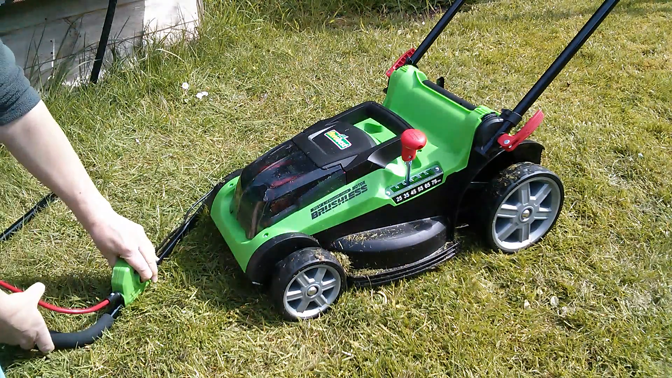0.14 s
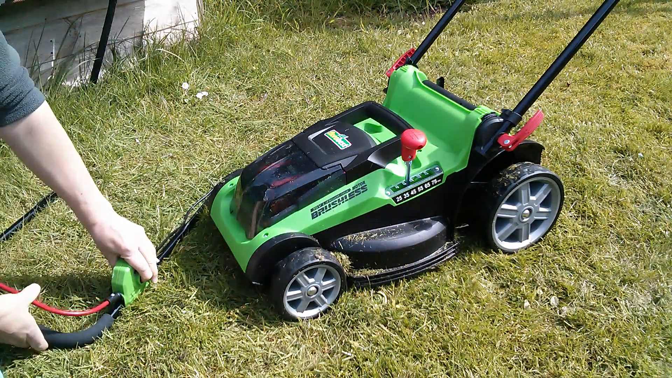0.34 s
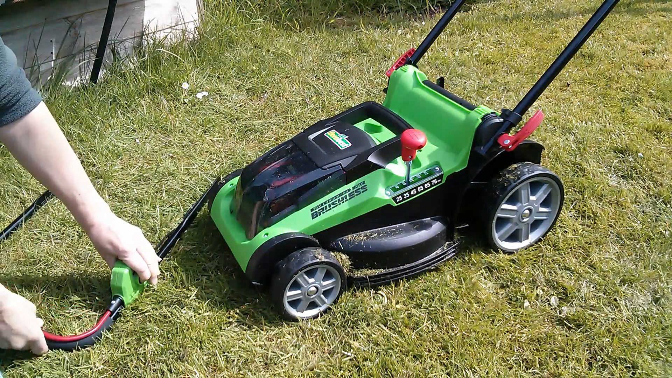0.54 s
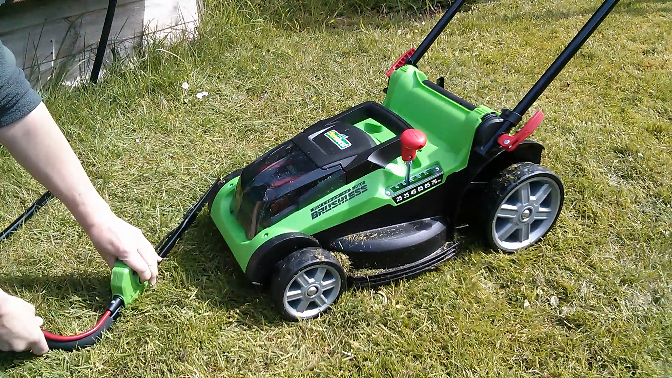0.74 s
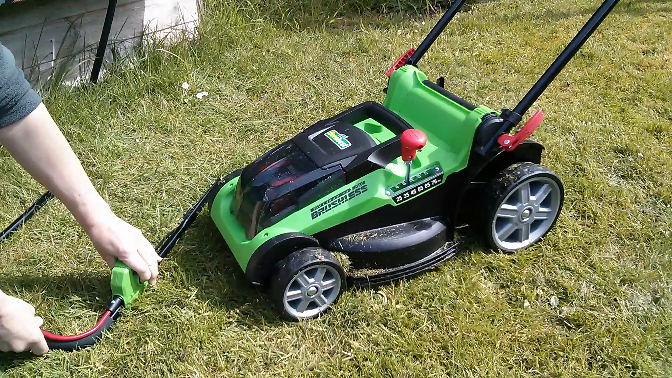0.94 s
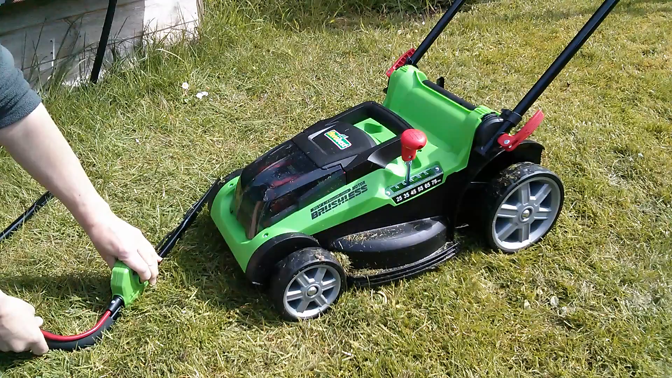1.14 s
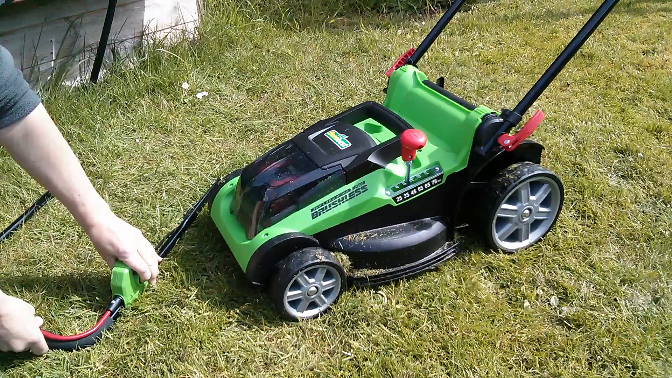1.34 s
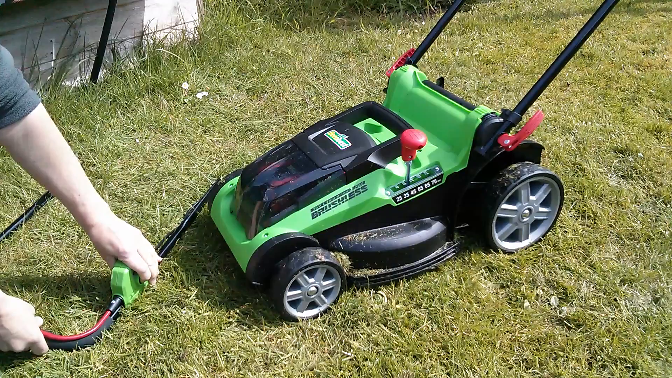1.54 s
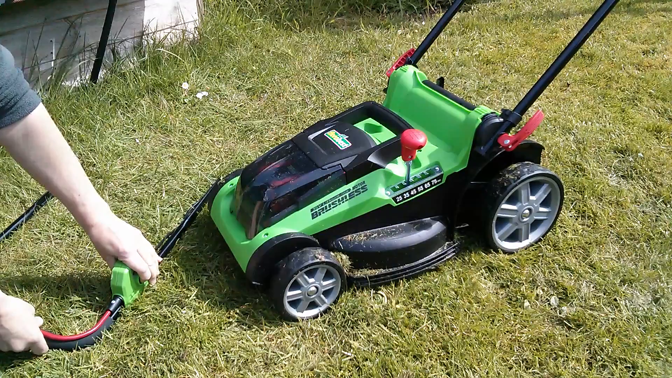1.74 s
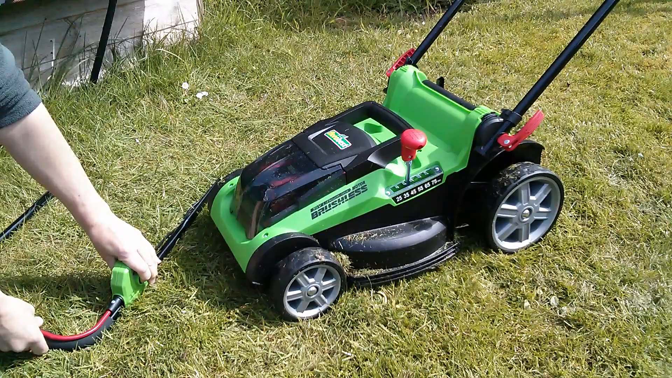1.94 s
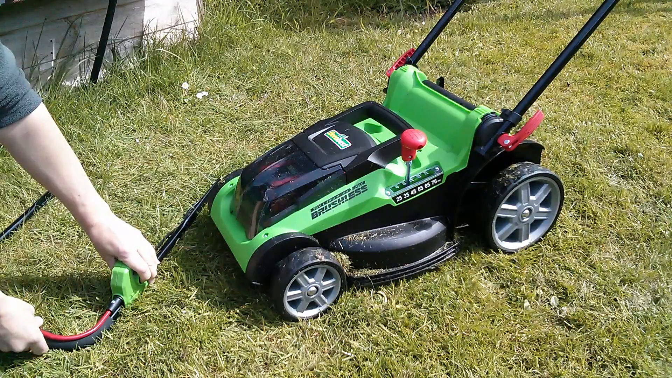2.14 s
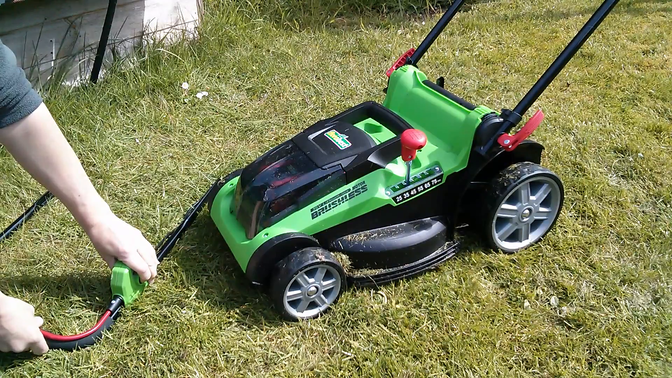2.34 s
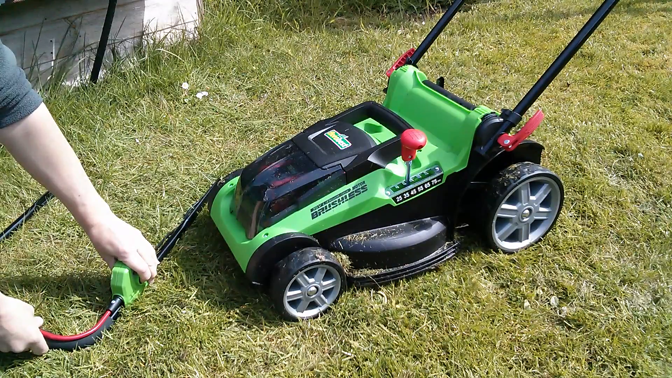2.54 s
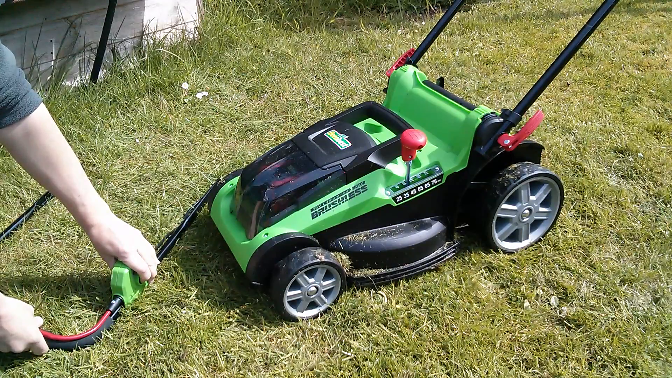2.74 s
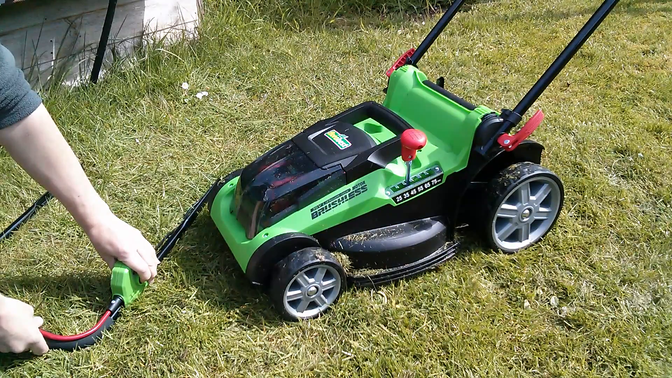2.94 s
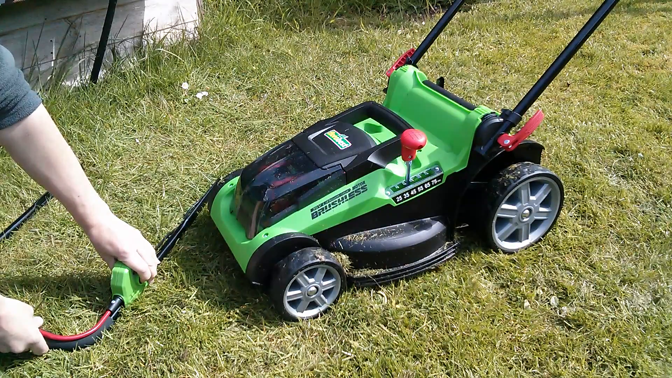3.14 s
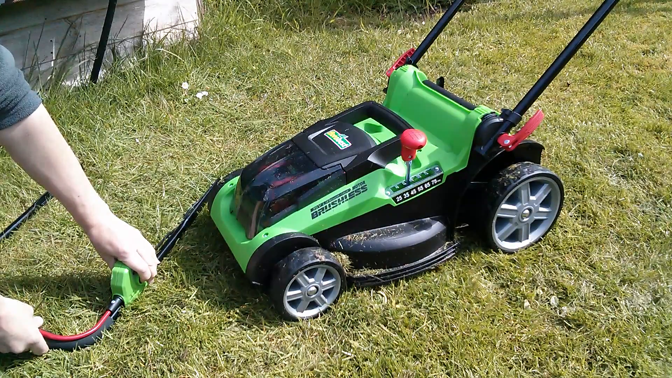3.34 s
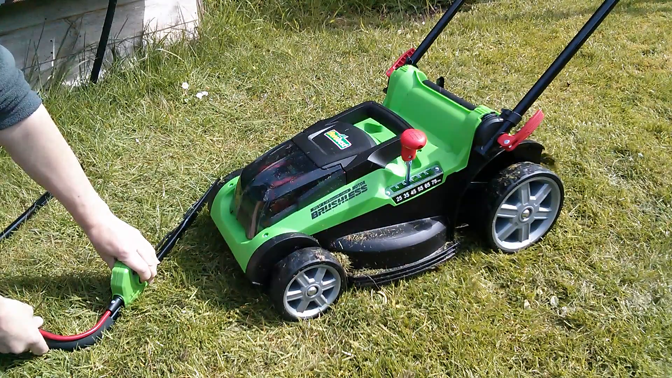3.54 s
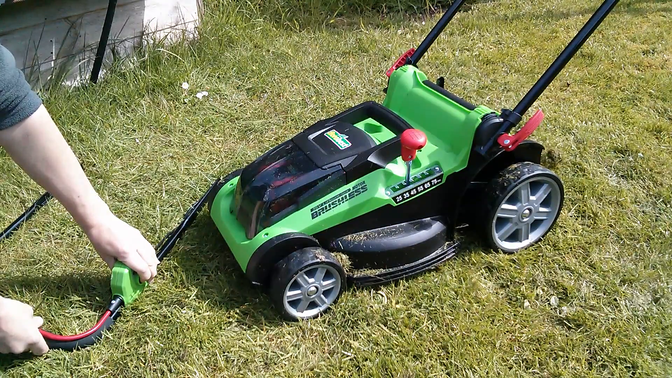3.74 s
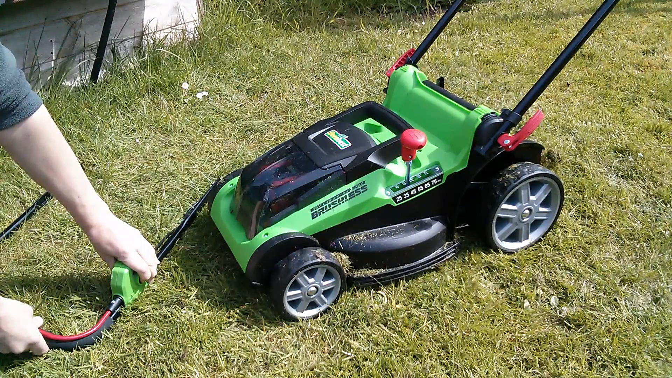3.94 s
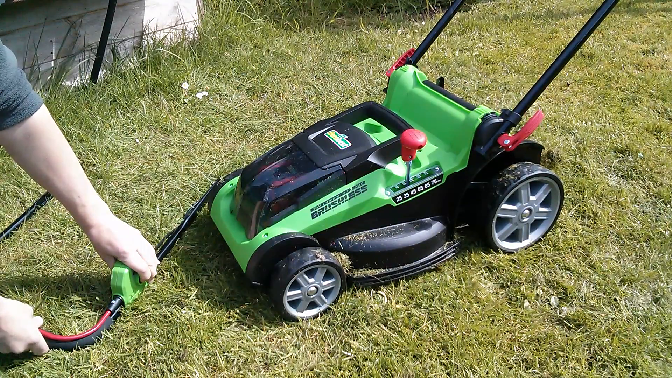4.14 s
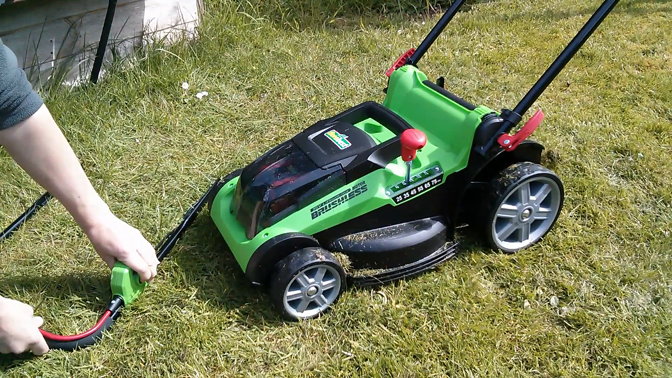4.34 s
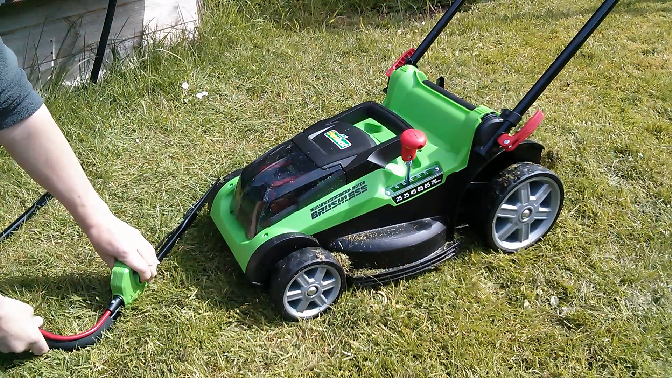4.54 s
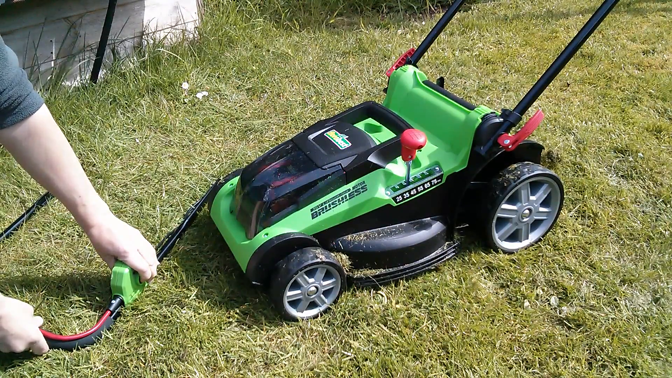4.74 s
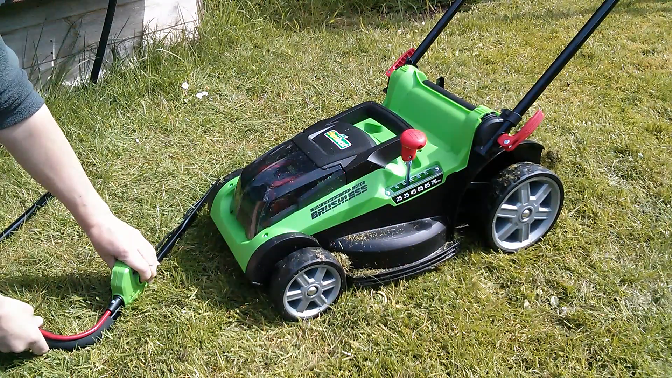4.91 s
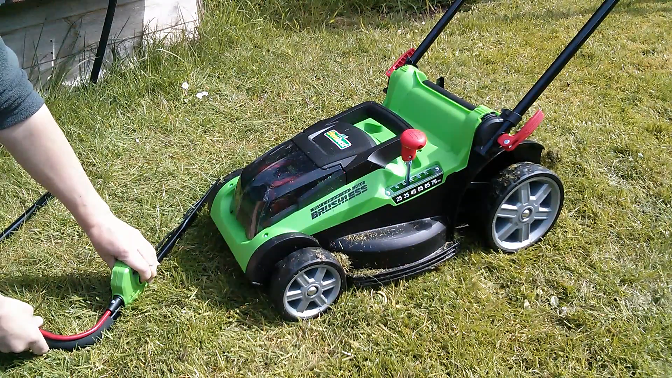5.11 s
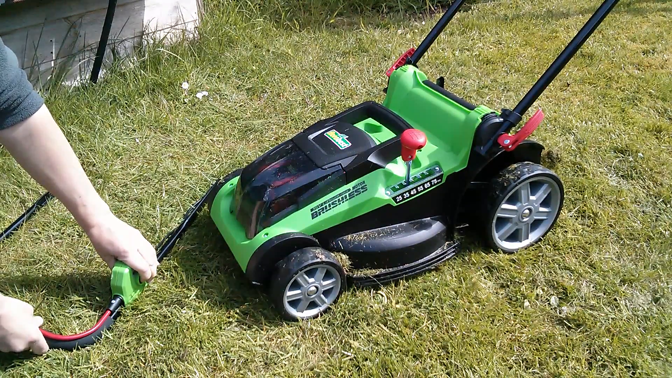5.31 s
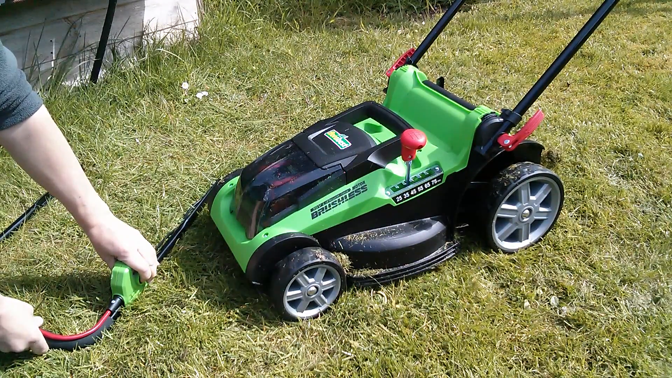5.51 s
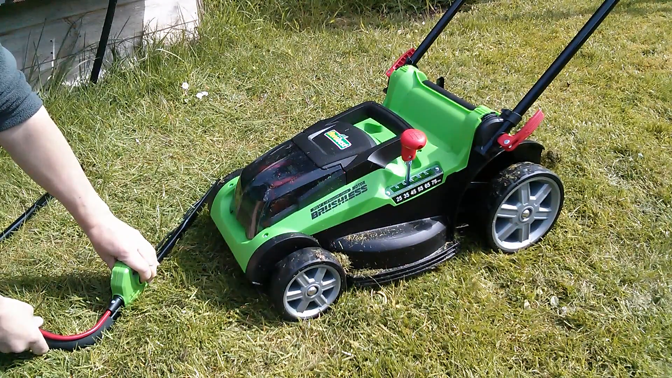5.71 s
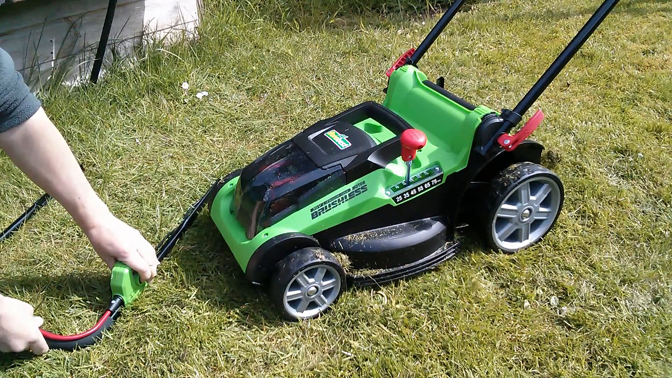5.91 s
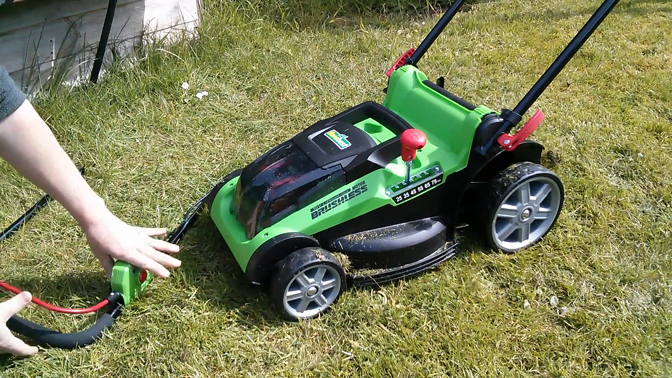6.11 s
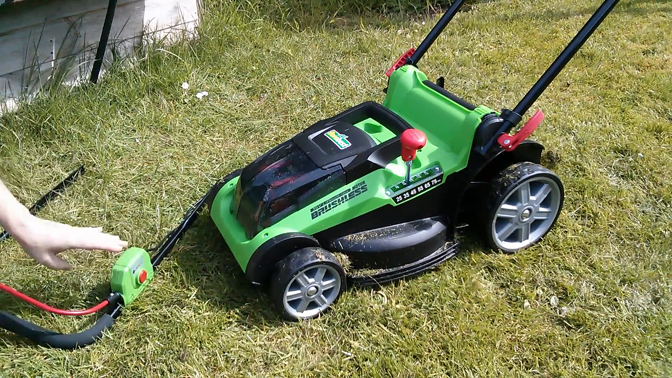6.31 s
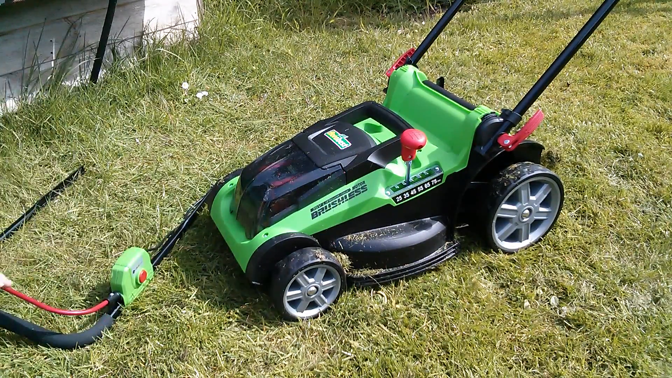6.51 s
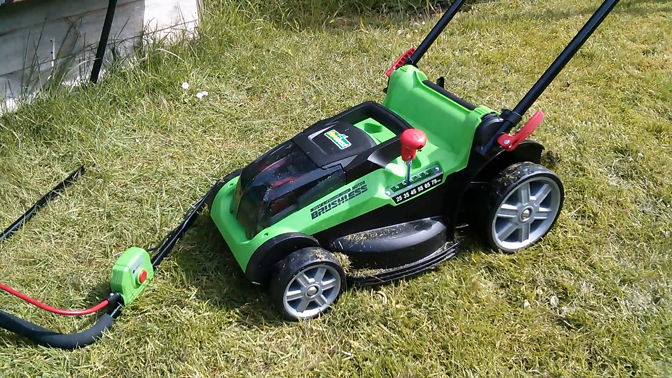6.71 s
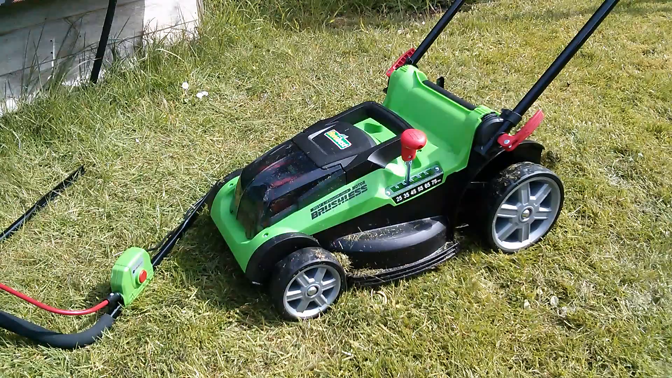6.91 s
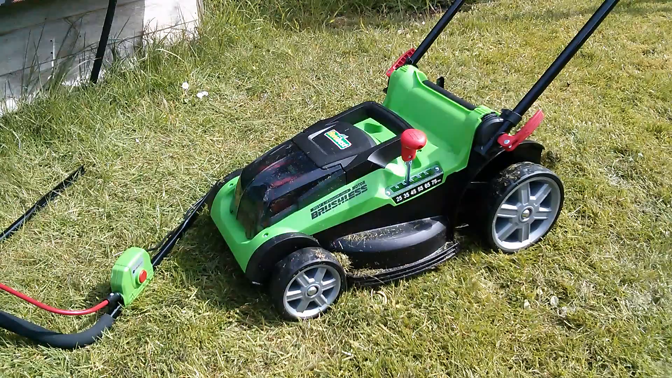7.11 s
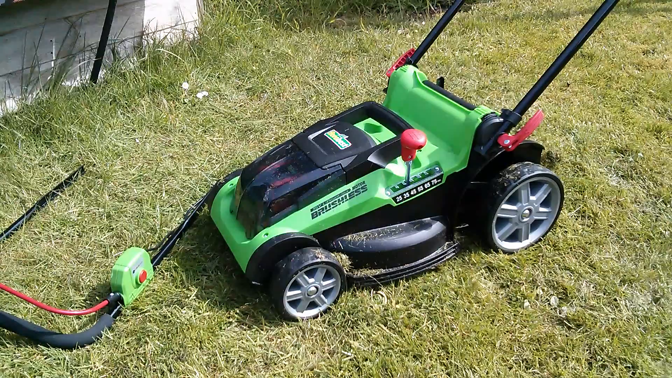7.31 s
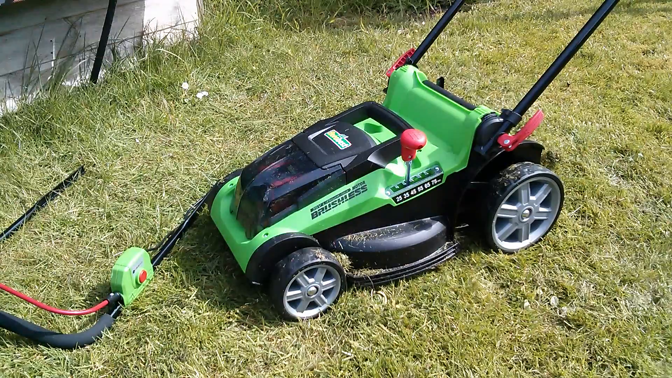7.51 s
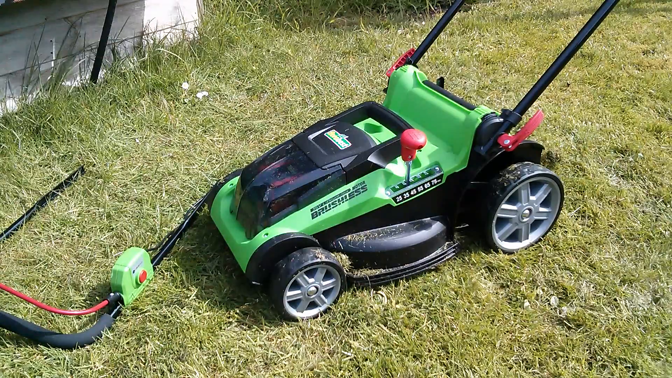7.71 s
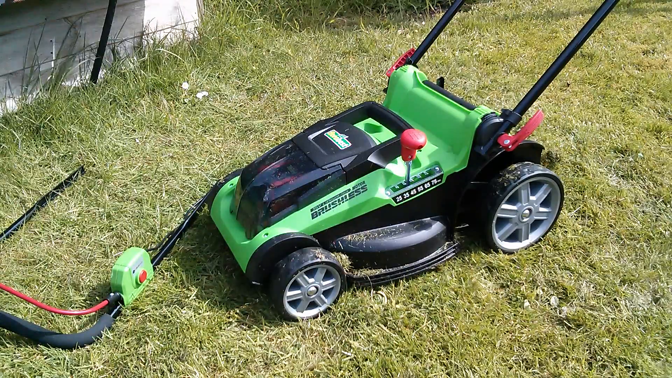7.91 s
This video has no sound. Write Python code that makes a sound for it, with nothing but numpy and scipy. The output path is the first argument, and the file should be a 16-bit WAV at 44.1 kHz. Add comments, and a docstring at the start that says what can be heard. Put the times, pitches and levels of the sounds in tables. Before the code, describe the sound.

A small plastic switch clicks, then a cordless lawnmower starts with a brief stuttering buzz. Its blade spins up with a rising whine and a growing rush of air, and a few grass clippings tick against the deck. It hums steadily until a lever snaps back, then falls in pitch and fades. Light gusts rumble on the microphone now and then over a quiet garden.

```python
"""A lawn in a light breeze, with a cordless mower standing on it. The switch clicks; the brushless motor
jerks into step and spins the blade up. Blade harmonics hum, tip turbulence rushes, clippings tick on
the deck, and the motor's magnetic lines whine through the housing's resonances. The lever snaps back,
the blade slows, and its sound is faded down. Gusts buffet the microphone now and then."""
import sys
import numpy as np
from scipy import signal
from scipy.fft import rfft, irfft, next_fast_len
from scipy.io import wavfile
from scipy.ndimage import uniform_filter1d

SR = 44100
rng = np.random.default_rng(int(sys.argv[2]) if len(sys.argv) > 2 else 0)


def to_wav(s):
    """Save 16-bit WAV."""
    ch = np.atleast_2d(s).T  # columns
    pcm = np.round(np.clip(ch, -1, 1) * 32767)  # PCM
    wavfile.write(sys.argv[1], SR, pcm.astype(np.int16))


N = 351164
TIME_S = np.arange(N) / SR
FREQ_HZ = np.maximum(np.fft.rfftfreq(next_fast_len(N), 1 / SR), 1)
POWER_ON_S, POWER_OFF_S, FULL_SPEED_RPS = 1.262, 6.195, 102.8

# Noise spectra, shape only: freq_hz, density_db
GARDEN_SPECTRUM = [(200, -7.5), (380, -6), (520, -2), (800, 0), (1050, -2.5), (1500, -10), (2100, -18.5),
                   (3100, -32), (4800, -28), (9000, -28), (15000, -26.5)]
FAINT_HISS_SPECTRUM = [(2500, -16), (4500, -5), (9000, -1), (12000, -1), (15800, 7.5)]
WIND_SPECTRUM = [(20, -16.5), (40, -1.5), (65, 2), (120, 1), (185, -6), (240, -15), (330, -30),
                 (500, -41.5)]
SWAY_SPECTRUM = [(15, -9.5), (30, -5), (50, -1)]  # slowest pressure swings
GUST_SPECTRUM = [(25, -14.5), (60, -1), (120, -2), (190, -6), (320, -20.5), (600, -60.5)]
CLICK_SPECTRUM = [(400, 7.5), (1200, 5.5), (2800, -12), (4500, -6), (8700, 0), (11000, -2), (15500, -21)]
RASP_SPECTRUM = [(1500, 1.5), (3000, -21.5), (5500, -11), (7000, -6.5), (8000, 1), (9600, 2),
                 (10800, -20.5), (13000, -9.5), (15500, -19.5)]
RATTLE_SPECTRUM = [(2500, -3), (4600, -2.5), (6200, 1), (7500, -4), (9000, 6), (11000, -4), (13000, -6),
                   (15500, -5)]
WINDING_SPECTRUM = [(2900, -25), (3350, 0.5), (3700, 4.5), (4300, -10)]
RUSH_SPECTRUM = [(260, -59.5), (450, -1), (626, -3), (760, -7), (840, -7.5), (998, -10.5), (1380, -8),
                 (1760, -15.5), (2030, -15.5), (2180, -20), (2360, -22.5), (2500, -27), (3250, -73.5),
                 (5500, -120)]
ROAR_SPECTRUM = [(90, -11.5), (150, -0.5), (300, 3.5), (430, 0.5), (520, -28)]
HISS_SPECTRUM = [(2290, -44), (3900, -4.5), (4440, -3.5), (4990, -6), (6530, -2.5), (8800, 0.5),
                 (13400, -20.5), (15100, -18.5), (15800, -18.5)]
VENT_SPECTRUM = [(2100, 0.5), (2400, 6.5), (2700, 5.5), (3400, 2), (3900, -2.5), (4300, -4)]

# Resonant modes: freq_hz, gain_db, t60_s
SWITCH_BOX_MODES = [(620, -15.5, 0.027), (1010, -21, 0.044), (1410, -17, 0.04), (1880, -16, 0.022),
                    (3220, -16, 0.021), (4000, -16, 0.027), (4600, -6, 0.015), (5160, -9, .008),
                    (6740, -2.5, 0.0039), (7660, -5, .006), (8560, 3.5, 0.0053), (10360, -9, 0.0061),
                    (12500, -8, .004)]
HANDLE_MODES = [(1870, -12.5, 0.017), (3970, -14, 0.073), (4570, 1.5, 0.02), (4860, -12.5, .02)]
STEEL_MODES = [(6270, -6, 0.029), (6800, -1, 0.013), (8000, 2, 0.0065), (9050, -2.5, 0.0089),
               (10600, -1, 0.0087)]  # blade and hub

# Radiation of tones by pitch: freq_hz, gain_db
BUZZ_RESPONSE = [(248, 2), (496, -3), (744, -9), (992, -23), (1240, -24), (1490, -24), (1740, -37),
                 (2480, -40)]
COGGING_RESPONSE = [(600, -38), (750, -53), (830, -33.5), (960, -45.5), (1085, -48), (1270, -59),
                    (1470, -47), (1700, -47), (2320, -59.5)]
HOUSING_RESPONSE = [(600, -22), (1500, -23), (2400, -5), (2900, -26), (3150, -10.5), (3340, -2.5),
                    (3650, -1), (3900, 1.5), (4300, -13), (6000, -25.5), (8400, -20), (9040, 6.5),
                    (9700, -28)]
DECK_RESPONSE = [(50, -19), (103, -8), (140, -3), (206, -1.5), (250, 1.5), (308, -4.5), (411, -9),
                 (514, -18), (617, -15), (720, -25.5), (1030, -24.5), (1240, -22), (1340, -18.5),
                 (1700, -31)]

# Breeze strength: time_s, level_db
BREEZE_CURVE = [(0.0, -44), (0.42, -49), (0.52, -56), (0.64, -41), (1.13, -40), (1.28, -50), (1.85, -35.5),
                (3.2, -30.5), (4.0, -34), (4.55, -27.5), (5.6, -30), (6.38, -45), (6.65, -33), (7.2, -34),
                (7.58, -47.5), (7.8, -44), (7.96, -30)]
# Single eddies: centre_s, level_db, half_width_s
EDDIES = [(0.233, -29, 0.016), (0.747, -30.5, 0.0061), (1.128, -26, 0.015), (1.624, -29, 0.014),
          (1.884, -21, 0.022), (2.909, -17.5, 0.016), (3.31, -17, 0.09), (5.257, -17, 0.03),
          (5.443, -21, 0.023), (5.542, -13.5, 0.053), (5.892, -19, 0.022), (6.193, -13.5, 0.032),
          (6.581, -15.5, 0.024), (6.879, -24, 0.024), (6.931, -19.5, 0.0086), (7.123, -10.5, 0.0069),
          (7.157, -19.5, 0.012), (7.33, -28.5, 0.018), (7.893, -29, 0.018)]
# Reflection off close surfaces: freq_hz, gain_ratio
REFLECTION = [(1500, 0.0031), (2100, 0.11), (2500, 0.3), (3500, 0.5), (4200, 0.7), (5200, 0.16),
              (7000, 0.048)]
# Start button and latch contacts: start_s, level_db, tilt_db_per_octave
SWITCH_CONTACTS = [(.4622, -53, 3), (0.4798, -19.5, 1), (0.4818, -28.5, -4), (0.508, -29, 1),
                   (0.511, -27.5, 6), (0.512, -35, 1), (.532, -43.5, -8), (1.2743, -36, 3)]
# Lever hitting its stop: start_s, rasp_db, ring_db
LEVER_HITS = [(6.189, -23.5, -27.5), (6.1980, -9.5, -28.5), (6.1994, -10.5, -31.5), (6.2020, -19, -7.5),
              (6.2065, -20.5, -25.5), (6.2100, -15.5, -34.5), (6.2145, -20, -29.5), (6.2200, -20.5, -42),
              (6.233, -23, -53)]
# Large bits of grass hitting the deck: start_s, level_db
GRASS_HITS = [(1.982, -22), (2.165, -22), (2.2858, -28), (2.343, -22), (2.3933, -14), (2.418, -19)]
# Rotor jerks: start_s, length_s, buzz_db, rattle_db, steel_db
ROTOR_JOLTS = [(1.260, .028, -35.5, -62, -74), (1.291, 0.018, -26, -62, -55),
               (1.317, 0.0098, -33.5, -44.5, -40.5), (1.368, 0.012, -34.5, -55, -55)]
# Magnetic lines: shaft_order, level_db, resonance_hz
MAGNETIC_LINES = [(16, 9, 3600), (32, -2, 3325), (40, -2, 3650), (48, -13.5, 5200), (56, -1, 3370),
                  (64, -4.5, 3620), (72, -15, 5000), (80, -3.5, 3350), (88, -9, 4000)]
# Shaft speed: time_s, speed_rps
SPEED_CURVE = [(1.26, 3), (1.33, 22), (1.42, 33), (1.5, 38.7), (2.0, 62.9), (2.5, 84.8), (2.88, 99.9),
               (3.05, 103.9), (3.2, 104.7), (3.6, 102.85), (5.4, 102.6), (5.7, 103.7), (6.2, 102.4),
               (6.75, 77), (7.15, 61.3), (7.72, 42.2), (7.96, 27.3)]


def from_db(db):
    """Decibels to gain."""
    return 10 ** (np.asarray(db) / 20)


def unit_rms(x):
    """Scale to unit power."""
    return x / np.sqrt(np.mean(x ** 2) + 1e-20)


def levelled(x, span_samples):
    """Hold unit power over a sliding span."""
    return x / np.sqrt(uniform_filter1d(x ** 2, size=span_samples) + 1e-6)


def at_hz(table, hz):
    """Interpolate on a log-frequency axis."""
    freq_hz, value = np.transpose(table)
    return np.interp(np.log(hz), np.log(freq_hz), value)


def filtered(x, response):
    """Apply a frequency response."""
    size = next_fast_len(N)
    return irfft(rfft(x, size) * response, size)[:N]


def noise(spectrum):
    """Unit-power coloured noise, falling 60 dB per octave past the table's ends."""
    octaves_out = np.abs(np.log2(FREQ_HZ / np.clip(FREQ_HZ, spectrum[0][0], spectrum[-1][0])))
    response = from_db(at_hz(spectrum, FREQ_HZ) - 60 * octaves_out)
    return unit_rms(filtered(rng.standard_normal(N), response))


def drift(rate_hz):
    """Slow random wander, unit RMS."""
    return unit_rms(filtered(rng.standard_normal(N), 1 / (1 + (FREQ_HZ / rate_hz) ** 2)))


def ring(x, hz, t60_s):
    """Resonator: a unit impulse rings a decaying unit sine."""
    radius, step_rad = from_db(-60 / (t60_s * SR)), 2 * np.pi * hz / SR
    return signal.lfilter([0, np.sin(step_rad)], [1, -2 * radius * np.cos(step_rad), radius ** 2], x + 1e-18)


def impulses(start_s, level_db):
    """One-sample hits."""
    hits = np.zeros(N)
    hits[np.round(start_s * SR).astype(int)] = from_db(level_db)
    return hits


def bursts(start_s, level_db, t60_s):
    """Envelope of sudden decaying onsets, summed in power."""
    decay = from_db(-60 / (t60_s * SR))
    return np.sqrt(signal.lfilter([1], [1, -decay ** 2], impulses(start_s, level_db) ** 2 + 1e-18))


def speed_gain(speed_rps, full_db, db_per_decade):
    """Power law of shaft speed."""
    return from_db(full_db + db_per_decade * np.log10(speed_rps / FULL_SPEED_RPS))


def powered(fade_s=0.023):
    """One until power-off, then a ramp to zero."""
    return np.clip(1 - (TIME_S - POWER_OFF_S) / fade_s, 0, 1)


def garden(floor_db=-61, hiss_db=-57, hiss_t60_s=1.0):
    """Steady outdoor noise; a faint bright hiss dies away at the start."""
    floor = from_db(floor_db) * noise(GARDEN_SPECTRUM)
    return floor + from_db(hiss_db - 60 * TIME_S / hiss_t60_s) * noise(FAINT_HISS_SPECTRUM)


def wind(lump_db=6.5, sway_db=-13):
    """Lumpy rumble on the microphone; single eddies hit harder and brighter."""
    breeze_db = np.interp(TIME_S, *np.transpose(BREEZE_CURVE))
    strength = from_db(breeze_db + lump_db * np.minimum(drift(10), 1.6))
    rumble = levelled(noise(WIND_SPECTRUM), 3000) + from_db(sway_db) * noise(SWAY_SPECTRUM)
    swell = sum(from_db(db) / (1 + ((TIME_S - centre_s) / half_width_s) ** 4)
                for centre_s, db, half_width_s in EDDIES)
    return strength * rumble + swell * levelled(noise(GUST_SPECTRUM), 1200)


def reflected(x, delay_s=0.003):
    """One short reflection combs the upper midrange."""
    gain = at_hz(REFLECTION, FREQ_HZ)
    comb = 1 + gain * np.exp(-2j * np.pi * FREQ_HZ * delay_s)
    return filtered(x, comb / np.sqrt(1 + gain ** 2))


def switch(ring_db=-2, scatter_db=3.5, crack_db=-10, crack_t60_s=0.0055, tail_db=-28, tail_t60_s=0.47):
    """Each contact cracks and rings the plastic box; the yard returns a faint tail."""
    start_s, level_db, tilt_db_per_octave = np.transpose(SWITCH_CONTACTS)
    box = 0
    for k, (hz, mode_db, t60_s) in enumerate(SWITCH_BOX_MODES):
        hit_db = level_db + ring_db + mode_db + tilt_db_per_octave * np.log2(hz / 6000)
        hit_db += scatter_db * rng.standard_normal(len(start_s))
        box += (-1) ** k * ring(impulses(start_s, hit_db), hz, t60_s)
    crack = bursts(start_s, level_db + crack_db, crack_t60_s)
    tail = bursts(start_s, level_db + tail_db, tail_t60_s)
    return box + (crack + tail) * noise(CLICK_SPECTRUM)


def lever(rasp_t60_s=0.035):
    """A spring throws the lever back: plastic chatters, the handle rings."""
    start_s, rasp_db, ring_db = np.transpose(LEVER_HITS)
    hits = impulses(start_s, ring_db)
    handle = sum(from_db(db) * ring(hits, hz, t60_s) for hz, db, t60_s in HANDLE_MODES)
    return handle + bursts(start_s, rasp_db, rasp_t60_s) * noise(RASP_SPECTRUM)


def clippings(centre_s=2.5, spread_s=0.2, shower_db=-42.5, scatter_db=4, large_db=-12, t60_s=0.022):
    """Grass lifted by the blade ticks on the deck: a few large bits in a fine shower."""
    timing, size = rng.standard_normal((170, 2)).T
    shower_s = np.clip(centre_s + spread_s * timing, POWER_ON_S, POWER_OFF_S)
    shower = bursts(shower_s, shower_db + scatter_db * size, t60_s)
    start_s, level_db = np.transpose(GRASS_HITS)
    large = bursts(start_s, level_db + large_db, t60_s)
    return np.hypot(large, shower) * noise(RATTLE_SPECTRUM)


def jolt(start_s, length_s, attack_s=0.0033, t60_s=0.2):
    """Envelope of one rotor jerk: attack, hold, decay."""
    attack = np.clip((TIME_S - start_s) / attack_s, 0, 1)
    return attack * from_db(-60 * np.maximum(TIME_S - start_s - length_s, 0) / t60_s)


def inrush(knocks, singing_db=-47.5, chatter_db=-54, grind_db=-48.5, rise_s=0.07, fall_db_per_s=13):
    """Decaying start current: the windings sing; the drive chatters and grinds once it moves."""
    age_s = TIME_S - POWER_ON_S
    current = (age_s > 0) * from_db(-fall_db_per_s * age_s)
    moving = np.clip(age_s / rise_s, 0, 1) ** 2
    singing = from_db(singing_db) * noise(WINDING_SPECTRUM)
    drive = from_db(chatter_db) * knocks + from_db(grind_db) * noise(RUSH_SPECTRUM)
    return current * (singing + moving * drive)


def start_up(buzz_hz=246.8, wander=0.026, rough_db=-4, knock_depth=0.33):
    """Current pulses shake the rotor: a buzz, and a rattle that rings the drive's steel."""
    buzz_gain, rattle_gain, steel_gain = sum(from_db(levels_db)[:, None] * jolt(start_s, length_s)
                                             for start_s, length_s, *levels_db in ROTOR_JOLTS)
    phase = 2 * np.pi * np.cumsum(buzz_hz * (1 + wander * drift(40))) / SR
    tone = sum(from_db(at_hz(BUZZ_RESPONSE, k * buzz_hz)) * np.cos(k * phase + rng.uniform(0, 2 * np.pi))
               for k in range(1, 9))
    buzz = unit_rms(tone) + from_db(rough_db) * noise(RUSH_SPECTRUM)
    knocks = (1 + knock_depth * np.cos(phase)) * noise(RATTLE_SPECTRUM)
    steel = unit_rms(sum(from_db(db) * ring(knocks, hz, t60_s) for hz, db, t60_s in STEEL_MODES))
    return buzz_gain * buzz + rattle_gain * knocks + steel_gain * steel + inrush(knocks)


def controller(speed_rps, angle_rad, switching_hz=15918, whistle_db=-69, idle_db=-11, fade_rps=88):
    """Thin wavering whistle at switching rate minus pole rate; gone near full speed."""
    phase = 2 * np.pi * switching_hz * TIME_S - 8 * angle_rad
    level_db = whistle_db + idle_db * (1 - powered()) + 3 * drift(6)
    return from_db(level_db) * np.sin(phase) / (1 + (speed_rps / fade_rps) ** 20)


def cogging(speed_rps, angle_rad, waver_db=3.5, flutter_rad=0.4, mute_above_hz=1010, deck_mode_hz=395):
    """Eight poles and twelve slots cog 24 times a turn."""
    pitch_hz = 24 * speed_rps
    phase = 24 * angle_rad + flutter_rad * drift(30)
    driven = np.sin(phase) + from_db(-15) * np.sin(2 * phase)
    # After power-off the falling tone is muted above about 1 kHz.
    falling = from_db(-5) * np.sin(phase) / (1 + (pitch_hz / mute_above_hz) ** 20)
    gain = from_db(at_hz(COGGING_RESPONSE, pitch_hz) + waver_db * drift(14))
    tone = gain * (powered() * driven + (1 - powered()) * falling)
    # The pole rate sounds only while crossing a deck resonance.
    poles = from_db(-52) * np.sin(8 * angle_rad) / (1 + ((8 * speed_rps - deck_mode_hz) / 30) ** 2)
    return np.sqrt(2) * (tone + poles)


def whine(speed_rps, angle_rad, coupling_db=13, half_width_hz=60, flutter_rad=0.21):
    """Current-driven lines rise with speed; most flare briefly as they cross a resonance."""
    waver_db = np.clip(FULL_SPEED_RPS / speed_rps, 1, 2)  # more flicker below full speed
    lines = 0
    for order, line_db, resonance_hz in MAGNETIC_LINES:
        pitch_hz = order * speed_rps
        flare_db = coupling_db / (1 + ((pitch_hz - resonance_hz) / half_width_hz) ** 2)
        level_db = line_db + at_hz(HOUSING_RESPONSE, pitch_hz) + flare_db + waver_db * drift(31)
        lines += from_db(level_db) * np.sin(order * angle_rad + flutter_rad * drift(30))
    return np.sqrt(2) * speed_gain(speed_rps, full_db=-46, db_per_decade=13) * powered() * lines


def mower_fade(dip_db=-1.54, fade_start_s=6.71, fade_db=-14, fade_tau_s=0.21):
    """The hum and rush dip at power-off, then are quickly faded down."""
    fade = 1 - np.exp(-np.maximum(TIME_S - fade_start_s, 0) / fade_tau_s)
    return from_db(dip_db * (1 - powered()) + fade_db * fade)


def airflow(speed_rps, angle_rad, eddy_db=0.3, roar_db=-6, vent_db=-11, vent_idle_db=-5):
    """Tip turbulence swells twice a turn at the chute; the motor vents hiss less unpowered."""
    passing = np.cos(2 * angle_rad)
    rush_gain = speed_gain(speed_rps, full_db=-21.5, db_per_decade=57.7) * from_db(eddy_db * drift(7))
    rush = noise(RUSH_SPECTRUM) + from_db(roar_db) * noise(ROAR_SPECTRUM)
    vent = from_db(vent_db + vent_idle_db * (1 - powered())) * noise(VENT_SPECTRUM)
    hiss_gain = speed_gain(speed_rps, full_db=-33, db_per_decade=80) * from_db(eddy_db * drift(25))
    hiss = noise(HISS_SPECTRUM) + vent
    return rush_gain * rush * (1 + 0.16 * passing) + hiss_gain * hiss * (1 + 0.12 * passing)


def blade(speed_rps, angle_rad, shake_depth=0.091, jitter_rad=0.083):
    """Blade harmonics radiated by the deck: shaken by turbulence, duller at low speed."""
    shaken_rad = angle_rad + jitter_rad * drift(14)
    tilt_db_per_harmonic = speed_rps / FULL_SPEED_RPS - 1
    hum = 0
    for k in range(1, 17):
        level_db = at_hz(DECK_RESPONSE, k * speed_rps) + tilt_db_per_harmonic * max(k - 3, 0)
        gain = from_db(level_db) * (1 + shake_depth * drift(11))
        hum += gain * np.sin(k * shaken_rad + rng.uniform(0, 2 * np.pi))
    return np.sqrt(2) * speed_gain(speed_rps, full_db=-18.5, db_per_decade=75.3) * hum


def scene():
    """Mono mix; the shaft speed drives the motor tones, blade and airflow."""
    speed_rps = np.interp(TIME_S, *np.transpose(SPEED_CURVE))
    angle_rad = 2 * np.pi * np.cumsum(speed_rps) / SR
    shaft = speed_rps, angle_rad
    turning = np.clip((TIME_S - POWER_ON_S) / 0.025, 0, 1)
    motor = cogging(*shaft) + whine(*shaft) + controller(*shaft)
    deck = mower_fade() * (blade(*shaft) + airflow(*shaft))
    background = wind() + garden()
    mower = reflected(turning * (deck + motor) + start_up() + clippings())
    return (mower + switch() + lever() + background)[None]


def record(dry, ceiling=0.78, cutoff_hz=15900):
    """Soft peak limiter, then a steep low-pass."""
    rounded = dry / (1 + (dry / ceiling) ** 8) ** (1 / 8)
    return signal.sosfilt(signal.ellip(12, 0.1, 90, cutoff_hz, fs=SR, output="sos"), rounded)


dry = scene()
out = record(dry)
to_wav(out)
```